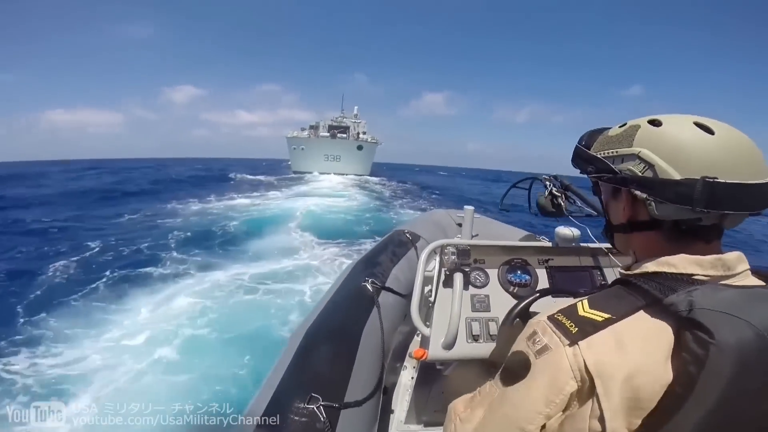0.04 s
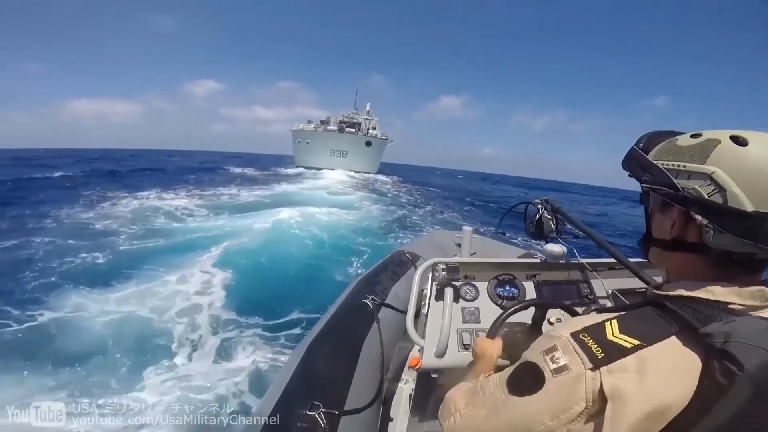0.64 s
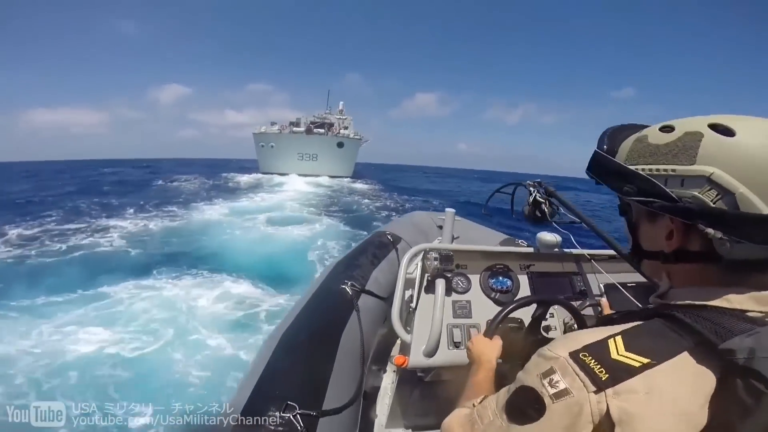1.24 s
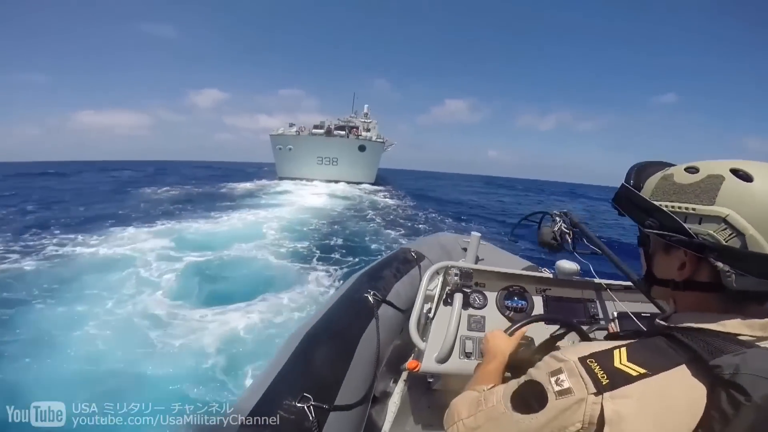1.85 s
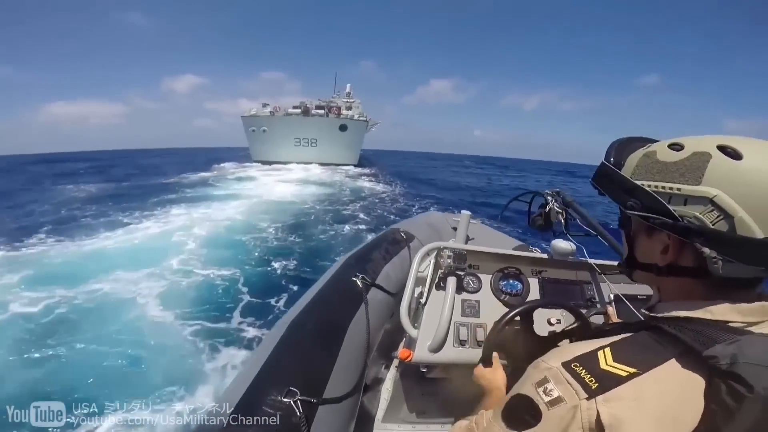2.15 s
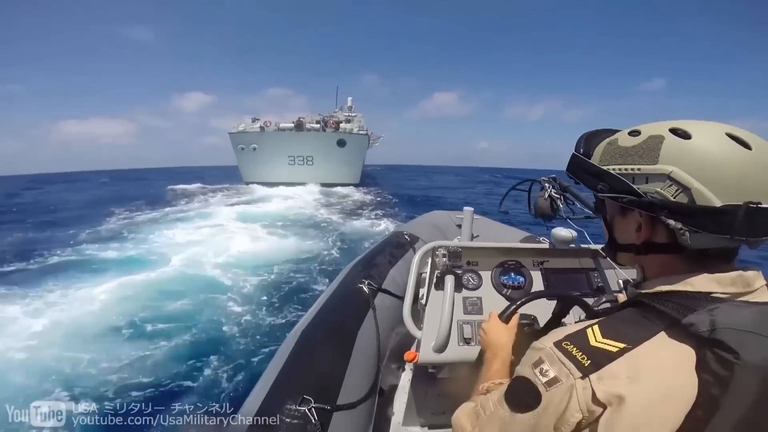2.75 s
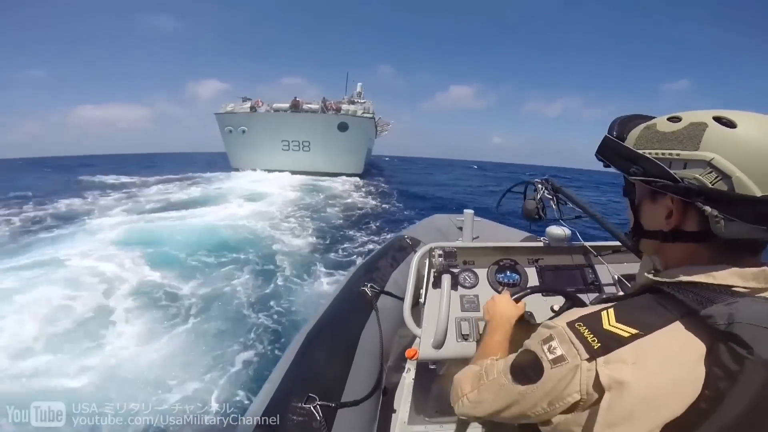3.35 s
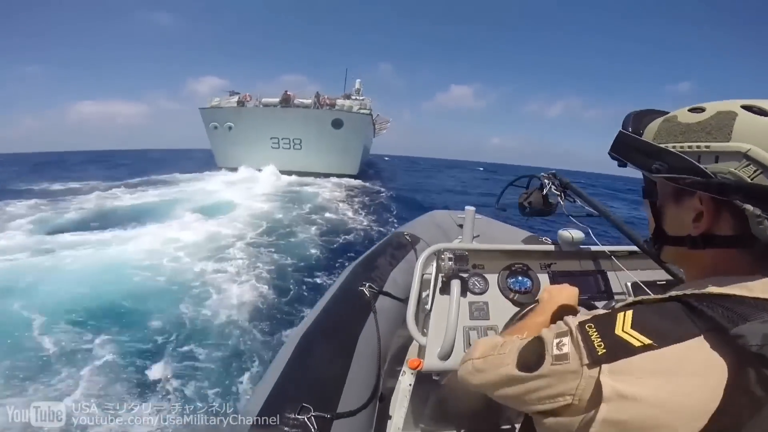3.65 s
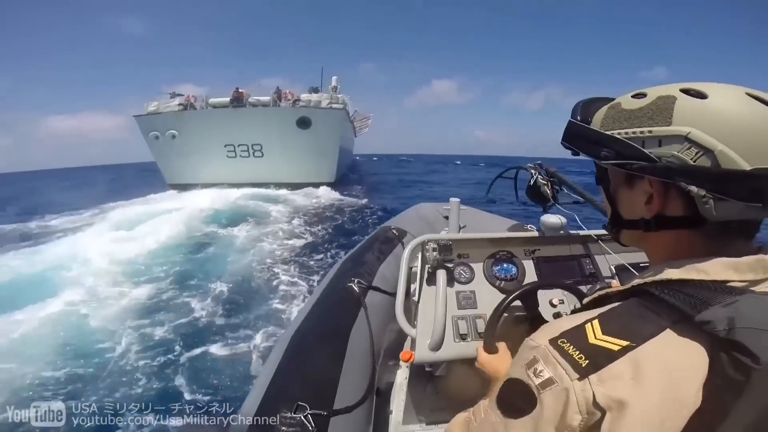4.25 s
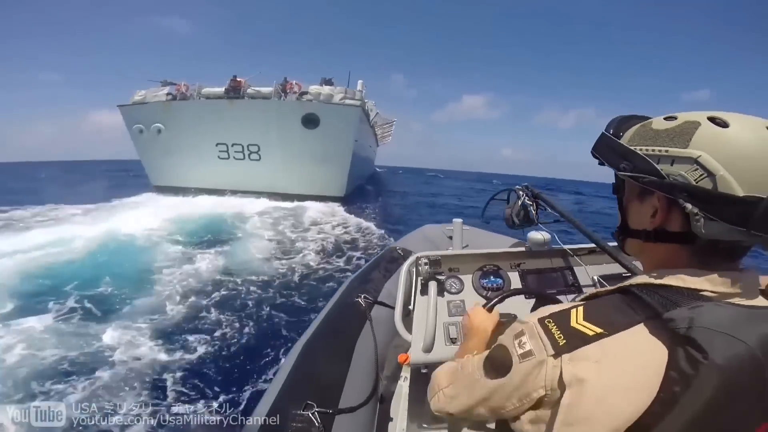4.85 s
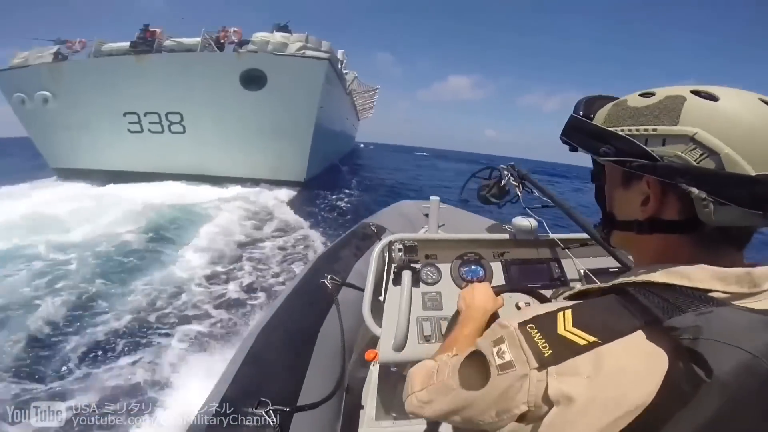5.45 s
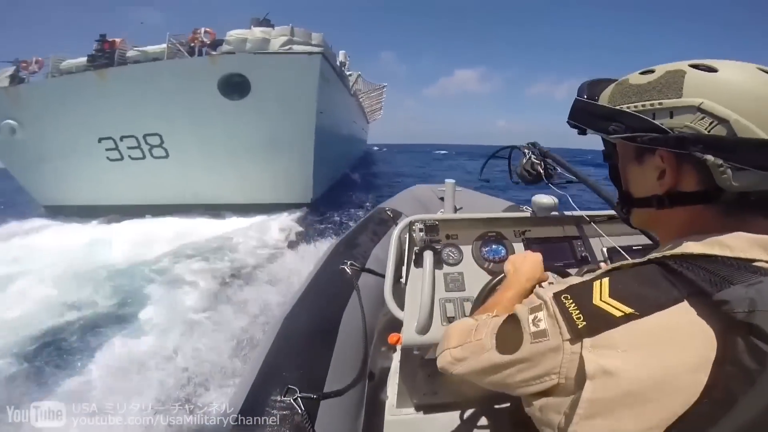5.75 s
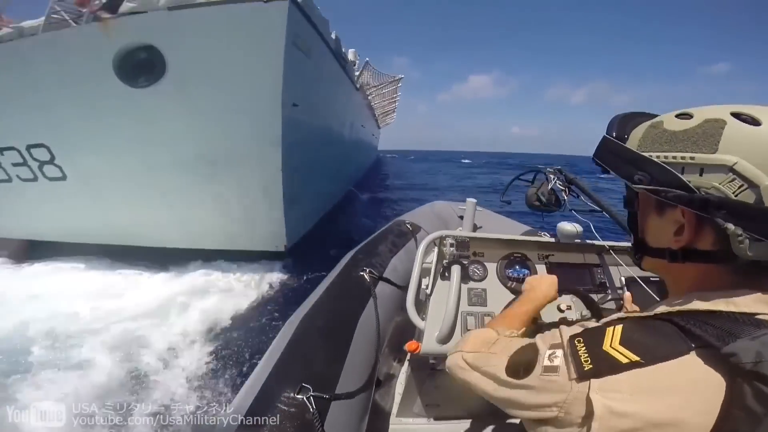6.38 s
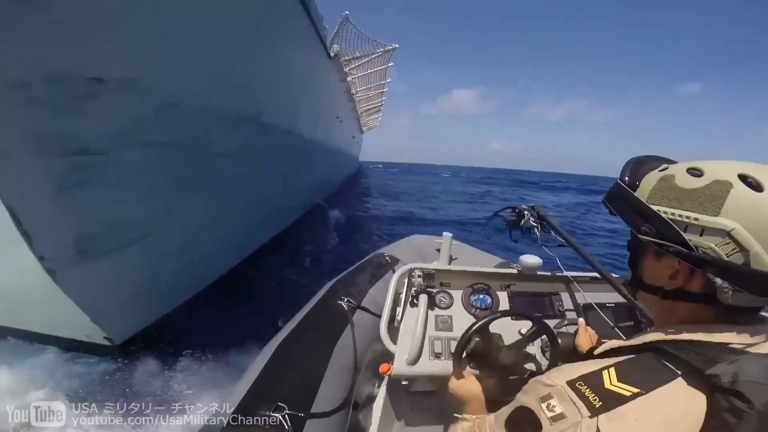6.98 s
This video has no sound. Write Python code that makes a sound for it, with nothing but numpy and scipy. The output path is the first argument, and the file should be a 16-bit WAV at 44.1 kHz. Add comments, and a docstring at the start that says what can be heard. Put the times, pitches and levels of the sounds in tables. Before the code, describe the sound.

Wind buffets the microphone on a fast inflatable boat while an outboard motor drones and water and spray rush along the hull.

```python
"""Inflatable boat in a ship's wake

Wind thumps, booms and rushes over a camera's waterproof case on board. The outboard motor drones
underneath, water washes along the hull and spray hisses up with each wave. A few drops knock on
the case, whose ringing colours the wind and the water."""
import sys
import numpy as np
from scipy import signal
from scipy.fft import rfft, irfft
from scipy.io import wavfile

SR = 44100
rng = np.random.default_rng(int(sys.argv[2]) if len(sys.argv) > 2 else 0)


def dump_mix(stems):
    """Bounce the given channels to the path in sys.argv[1] as a 16-bit WAV at rate SR."""
    frames = np.atleast_2d(stems).T  # one column per channel
    limited = np.clip(frames, -1, 1)  # hard clip at full scale
    pcm = np.round(limited * 32767).astype(np.int16)
    wavfile.write(sys.argv[1], SR, pcm)


N = 318402
TIME = np.arange(N) / SR
HZ = np.fft.rfftfreq(N, 1 / SR)


def amp(db):
    """Turns decibels into a number to multiply by."""
    return 10 ** (np.asarray(db) / 20)


def unit(x):
    """Scales x so that its average strength (rms) is 1."""
    return x / np.sqrt(np.mean(x ** 2) + 1e-20)


def curve(rows, column=1):
    """Joins the points in a table's column with straight lines over time."""
    rows = np.asarray(rows)
    return np.interp(TIME, rows[:, 0], rows[:, column])


def wander(rate_hz):
    """A smooth random wobble, mostly slower than the given rate."""
    return unit(irfft(rfft(rng.standard_normal(N)) / (1 + (HZ / rate_hz) ** 4), N))


def swell(crest_s, length_s, rise_share=0.4):
    """A smooth hump of height 1 that builds a little faster than it dies."""
    width_s = length_s * np.where(TIME < crest_s, rise_share, 1 - rise_share)
    return np.exp(-((TIME - crest_s) / width_s) ** 2)


def lift_db(rows):
    """Adds a table of swells into one boost that changes over time."""
    return sum(db * swell(s, length) for s, length, db in rows)


def turbulence(depth_db, rate_hz):
    """Noise that swells and sinks as swirls pass."""
    return unit(rng.standard_normal(N) * amp(depth_db * wander(rate_hz)))


# Pitches that the case boosts or dulls. Each row: centre in Hz, width in Hz, boost in dB.
CASE_RESONANCES = [(208.7, 35, 7.5), (1291, 237, 10.5), (1605, 160, 1.5), (2360, 300, 8), (3020, 63, 4),
                   (3200, 120, -1.5), (3540, 180, 5), (3870, 340, 3.5), (4560, 190, 4), (4780, 90, -5),
                   (4920, 220, 4.5), (5380, 230, 3.5), (5870, 110, 1), (6270, 200, -8), (6890, 550, 3.5),
                   (9700, 400, -1), (11200, 850, 4), (11950, 250, -3)]

def through_case(x, colour, band_hz):
    """Gives x a tone colour and the case's ringing, then sets its strength within the band to 1."""
    case_db = sum(db / (1 + (2 * (HZ - hz) / width) ** 2) for hz, width, db in CASE_RESONANCES)
    hz, db = np.transpose(colour)
    colour_db = np.interp(np.log(HZ + 1), np.log(hz), db)
    cepstrum = irfft(np.log(amp(colour_db + case_db)), N)
    cepstrum[1:N // 2] *= 2  # folded so that the case rings after a push, never before
    cepstrum[N // 2 + 1:] = 0
    spectrum = rfft(x) * np.exp(rfft(cepstrum))
    in_band = (HZ > band_hz[0]) & (HZ < band_hz[1])
    return irfft(spectrum, N) / np.std(irfft(spectrum * in_band, N))


# The faint whine of the camera's electronics. Each row: pitch in Hz, level in dB.
WHINE_TONES = [(12450, -78), (12475, -81), (12775, -95)]

def electronics_whine():
    """Thin tones, so close in pitch that they beat against each other."""
    tones = (amp(db) * np.sin(2 * np.pi * (hz * TIME + rng.random())) for hz, db in WHINE_TONES)
    return np.sqrt(2) * sum(tones)


# How the motor runs. Each row: time in seconds, firings per second, level in dB.
MOTOR_RUN = [(0, 84.5, -38), (.7, 85.5, -46), (1.4, 86.3, -32.5), (2, 85.3, -46), (2.6, 85.04, -41.5),
             (3, 87.03, -37), (3.35, 88.9, -43), (3.8, 86.6, -48), (4.2, 84.95, -37.5), (4.55, 89.1, -35.5),
             (5.1, 87.84, -32), (5.5, 89.4, -33), (6.3, 85, -40.5), (7.22, 86.7, -38)]
# The tones in its exhaust. Each row: multiple of the firing rate, relative level in dB.
EXHAUST_TONES = [(1, 3.5), (1.5, -10), (2, -3), (2.5, -16), (3, -14.5), (3.5, -12.5), (4, -17), (4.5, -17)]

def outboard(waver=0.00766, rough_db=1.5):
    """Exhaust pulses make a stack of tones; uneven cylinders add roughness and in-between tones."""
    firings = np.cumsum(curve(MOTOR_RUN) * (1 + waver * wander(5.87))) / SR
    drone = np.zeros(N)
    for multiple, db in EXHAUST_TONES:
        gain = amp(db + rough_db * wander(11))
        drone += gain * np.cos(2 * np.pi * (multiple * firings + rng.random()))
    return unit(drone) * amp(curve(MOTOR_RUN, column=2))


# Whistles of the motor's drive. Each row: pitch in Hz, waver in Hz, level in dB at average load.
DRIVE_TONES = [(1359, 40, -53.5), (3535, 40, -71), (6225, 5, -80)]

def drive_whistles():
    """The drive sings faintly, louder under load, its pitch and strength never quite still."""
    load_db = curve(MOTOR_RUN, column=2)
    tones = np.zeros(N)
    for hz, waver_hz, db in DRIVE_TONES:
        gain = amp(db + 2 * wander(21))
        cycles = np.cumsum(hz + waver_hz * wander(49.1)) / SR
        tones += gain * np.sin(2 * np.pi * cycles)
    return np.sqrt(2) * tones * amp(0.87 * (load_db - load_db.mean()))


# Drops that hit the case. Each row: start in seconds, size in dB, ringing pitch in Hz.
DROP_HITS = [(1.584, -4.5, 2130), (1.6223, -12, 1550), (6.6918, -13.5, 2016)]
# The tone colour of a bursting drop. Each row: frequency in Hz, relative level in dB.
BURST_COLOUR = [(200, -2), (800, -3), (1400, 20), (3000, 8), (5500, -5), (8000, -6), (10000, -17),
                (12500, -16), (14200, -42)]

def drop_knocks(ring_s=0.0019, push_s=0.00021, push=3.1, crack_s=0.0014, crack_db=-18):
    """Each drop pushes the case wall in and rings it briefly; heavy drops crack much louder."""
    t = np.arange(SR // 20) / SR
    knocks, cracks = np.zeros(N), np.zeros(N)
    dent = -push * (t / push_s) ** 2 * np.exp(-t / push_s) * (1 - t / (4 * push_s))
    for start_s, db, hz in DROP_HITS:
        size, at = amp(db), round(start_s * SR)
        ring = 0.52 * np.sin(2 * np.pi * hz * t) * np.exp(-t / ring_s) * (1 - np.exp(-t / push_s))
        knocks[at:at + len(t)] += size * (ring + size * dent)
        cracks[at:at + len(t)] += size ** 2 * rng.standard_normal(len(t)) * np.exp(-t / crack_s)
    crack_gain = amp(crack_db) * np.sqrt(crack_s * SR / N)  # its level counts over its own short life
    return knocks + crack_gain * through_case(cracks, BURST_COLOUR, (0, 14950))


def droplets(per_s, spread_db):
    """Tiny impacts at random moments, a few of them large."""
    size = amp(spread_db * np.minimum(rng.exponential(1, N), 4))
    return unit(size * rng.choice([-1, 1], N) * (rng.random(N) < per_s / SR))


# Spray thrown up by the hull. Each row: peak time in seconds, length in seconds, relative level in dB.
SHOWERS = [(0.71, 0.48, -62.1), (1.03, 0.49, -66), (1.533, 0.13, -67.6), (2.514, 0.38, -61.5),
           (3.45, 0.25, -68.6), (3.86, 0.32, -62), (4.27, 1, -70), (5.321, 1, -67.5), (5.775, 0.41, -60),
           (6.164, 0.79, -57), (6.913, 0.38, -59), (7.23, 0.21, -52)]
# The tone colours of the wash and the spray. Each row: frequency in Hz, relative level in dB.
HULL_COLOUR = [(150, -9.5), (450, 17.5), (850, 17.5), (1100, 14), (1350, 12), (1900, 2), (3000, 0),
               (5000, -4), (7500, -8), (10000, -20), (15000, -42)]
FIZZ_COLOUR = [(400, -9), (1500, 4), (3000, 9.5), (5000, 11), (7000, 7.5), (8600, 2.5), (10000, -3.5),
               (11800, -2.5), (13400, -15), (15000, -15)]

def wash_and_spray(mist_db=-78):
    """Water washes along the hull, and showers fall back as fine drops over a constant mist."""
    shower_power = sum(amp(db - 1.5) ** 2 * swell(s, length) for s, length, db in SHOWERS)
    spray_db = 10 * np.log10(amp(mist_db) ** 2 + shower_power)
    # The wash grows as the boat closes on the ship, and with every shower.
    wash_db = -60 + 0.5 * TIME + 0.11 * (spray_db - mist_db)
    wash = through_case(turbulence(depth_db=2.7, rate_hz=7.5), HULL_COLOUR, (2700, 7500))
    fizz = rng.standard_normal(N) + amp(-4) * droplets(per_s=2500, spread_db=4)
    spray = through_case(fizz, FIZZ_COLOUR, (7500, 12000))
    return wash * amp(wash_db) + spray * amp(spray_db)


# Waves that the boat meets. Each row: peak time in seconds, length in seconds, boost in dB.
WAVE_SURGES = [(.68, 0.28, 6.5), (.91, 0.48, 6), (1.545, 0.27, 5.5), (2, 0.49, 6), (3.5, 0.086, 4.5),
               (3.9, 0.11, 5.5), (5.25, 0.093, 6), (5.405, .11, 5.5), (5.66, 0.16, 3.5), (5.955, 0.039, 6),
               (6.93, .18, 6.5)]

def surge_db():
    """How much the noise surges as the boat runs into each wave."""
    return lift_db(WAVE_SURGES)


# The tone colour of a sheet of water. Each row: frequency in Hz, relative level in dB.
HISS_COLOUR = [(1500, -11), (3600, -9), (4400, 5), (5400, 3), (6400, -14), (9000, -31)]

def water_sheet():
    """A hissing sheet of water peels off the boat's air tube as it crosses the wake."""
    hiss = through_case(rng.standard_normal(N), HISS_COLOUR, (2700, 7500))
    return hiss * amp(-53 + 0.95 * surge_db()) * swell(crest_s=5.19, length_s=0.87)


# The wind's strength, easing midway. Each row: time in seconds, level in dB.
WIND_STRENGTH = [(0, -36.5), (.45, -39), (1.2, -37), (2.95, -46.5), (4.5, -43), (5.05, -37), (5.5, -38),
                 (6.5, -42), (7.22, -38)]
# Gusts, then bursts of low booming. Each row: peak time in seconds, length in seconds, boost in dB.
WIND_GUSTS = [(.36, .1, 3.5), (1.05, .19, 9.5), (1.6, 0.19, 4.5), (2.31, 0.43, 5), (3.96, 0.38, 10.5),
              (4.62, 0.13, 7.5), (5.4, 0.7, 6.5), (6.35, 1, 4.5), (6.96, 0.23, 9)]
BOOM_BURSTS = [(.3, .12, 6), (.7, 0.072, 3.5), (1.1, .1, 6), (1.7, 0.32, 2.5), (3.95, 0.36, 2),
               (5.01, 0.14, 7.5), (5.27, 0.074, 5), (5.41, .08, 5), (5.71, 0.085, 6.5), (6.07, 0.36, 4)]
# The tone colours of the wind's three layers. Each row: frequency in Hz, relative level in dB.
WIND_THUMP_COLOUR = [(5, -7), (14, -9), (24, 4), (40, -5.5), (65, -1), (95, -4), (130, -10), (220, -29.5),
                     (600, -75)]
WIND_BOOM_COLOUR = [(40, -27.5), (90, -12.5), (125, 2.5), (175, -0.5), (222, -3), (250, -7.5), (310, -8.5),
                    (400, -15), (550, -26.5), (1200, -62.5)]
WIND_RUSH_COLOUR = [(100, -16.5), (350, 2), (520, -1), (800, -0.5), (1050, -6.5), (1450, -1), (2100, -3.5),
                    (2900, -10), (4200, -21.5), (5600, -21.5), (7500, -30), (10000, -46), (15000, -70)]

def wind(usual_db=-38.5):
    """Swirls of air thump the case, make it boom and rush over it; gusts and waves make them louder."""
    extra_wind_db = curve(WIND_STRENGTH) - usual_db
    thump_db = -32 + 1.01 * extra_wind_db + lift_db(WIND_GUSTS)
    boom_db = -31 + 0.56 * extra_wind_db + 0.4 * surge_db() + lift_db(BOOM_BURSTS)
    rush_db = -38.5 + 1.25 * extra_wind_db + surge_db()
    thump = through_case(turbulence(depth_db=-0.05, rate_hz=8.8), WIND_THUMP_COLOUR, (20, 110))
    boom = through_case(turbulence(depth_db=1.07, rate_hz=30), WIND_BOOM_COLOUR, (110, 400))
    rush = through_case(turbulence(depth_db=1.25, rate_hz=24), WIND_RUSH_COLOUR, (1100, 2700))
    return thump * amp(thump_db) + boom * amp(boom_db) + rush * amp(rush_db)


def scene():
    """Everything meets at one microphone."""
    wind_and_water = wind() + wash_and_spray() + water_sheet()
    motor = outboard() + drive_whistles()
    return (wind_and_water + motor + drop_knocks() + electronics_whine())[None]


def record(dry, cutoff_hz=14950):
    """The camera cuts off the very highest treble."""
    low_pass = signal.firwin(511, cutoff_hz, window=("kaiser", 9), fs=SR)
    return signal.oaconvolve(dry, low_pass[None], "same")


dry = scene()
out = record(dry)
dump_mix(out)
```